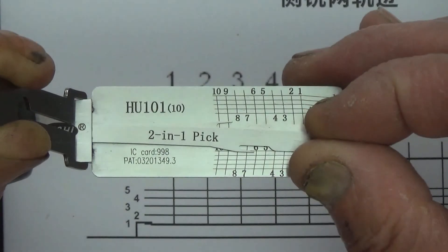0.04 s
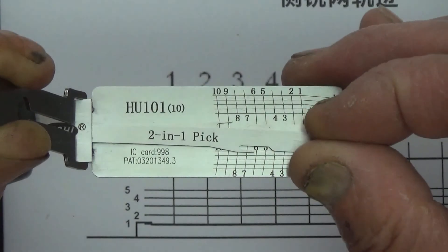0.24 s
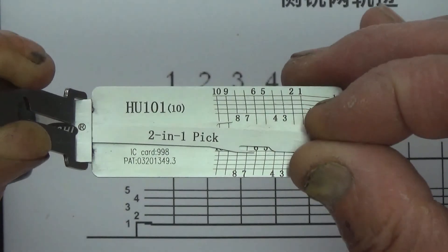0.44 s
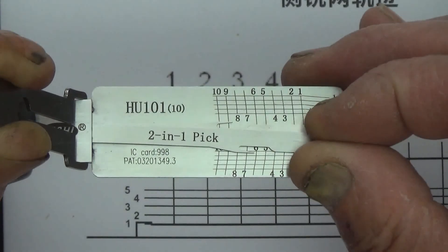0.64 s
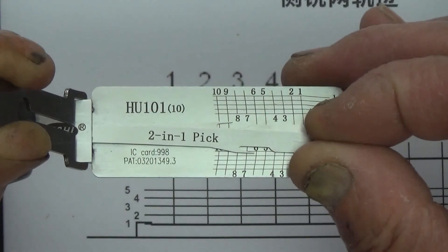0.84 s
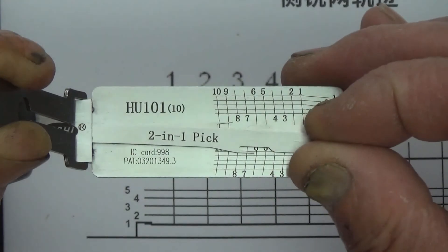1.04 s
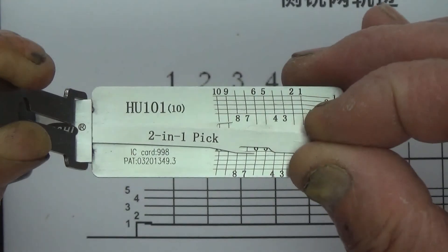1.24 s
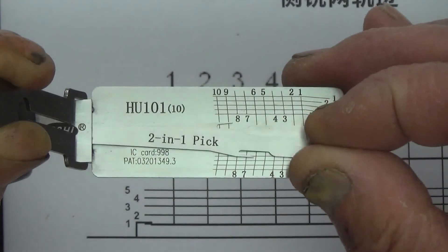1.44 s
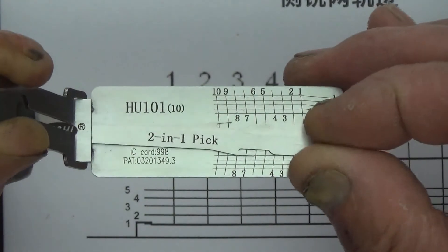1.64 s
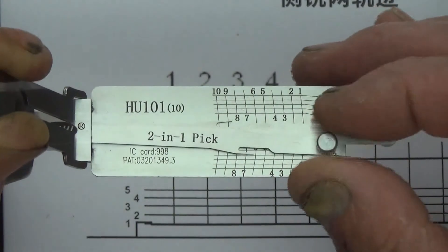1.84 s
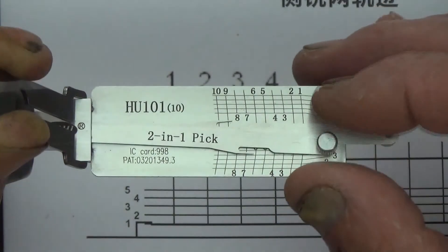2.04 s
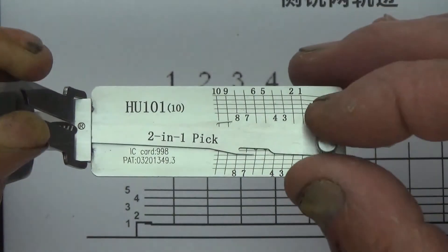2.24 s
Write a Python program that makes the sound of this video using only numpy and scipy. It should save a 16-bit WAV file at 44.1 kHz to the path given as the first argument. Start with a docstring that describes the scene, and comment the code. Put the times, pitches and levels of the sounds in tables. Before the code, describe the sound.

A steel lock pick snaps and clicks in a car lock over a faint fan hum.

```python
"""Picking a car lock

A steel pick works the wafers of a hand-held car lock, close up, over a desk in a small room.
A wafer snaps, ringing the steel and rattling loose parts; the lock knocks dully and the treble dips.
Later the grip shifts and the pick lever taps its stop: a tiny tick, then a light click.
Behind it a fan hums under a faint hiss."""
import sys
import numpy as np
from scipy import signal
from scipy.fft import rfft, irfft, next_fast_len
from scipy.io import wavfile
from scipy.ndimage import uniform_filter1d, map_coordinates

SR = 44100
rng = np.random.default_rng(int(sys.argv[2]) if len(sys.argv) > 2 else 0)


def file_out(sig):
    """Save sig as 16-bit WAV at sys.argv[1]."""
    # one column per channel
    cols = np.atleast_2d(sig).T
    # limit, then scale
    lim = np.clip(cols, -1, 1)
    pcm = np.round(lim * 32767).astype(np.int16)
    wavfile.write(sys.argv[1], SR, pcm)


N = 101871
T = np.arange(SR // 2) / SR  # time within one event, s

# Fan noise below, hiss above: f/Hz, relative level/dB
AIR_COLOUR = [(20, -25.5), (40, -5.5), (66, 1), (90, -4.5), (115, 3.5), (140, -5.5), (220, 1), (350, -4.5),
              (430, -4), (600, -9), (720, -10.5), (810, -4.5), (940, -10), (1010, -3.5), (1140, 0.5),
              (1210, -10.5), (1300, -7.5), (1450, -14.5), (2000, -17), (3000, -21.5), (4200, -24),
              (4500, -32.5), (4950, -69.5), (5300, -36), (5700, -22.5), (7000, -21), (8100, -21.5),
              (9000, -25), (9700, -32), (10400, -50.5), (11300, -59)]
# Left-right likeness of that noise: f/Hz, correlation
AIR_LIKENESS = [(60, -2.5), (140, 0.8), (340, 0.87), (810, 0.4), (1920, 0.97), (4560, 0.67), (10800, 0.16)]
# Its balance: f/Hz, left over right/dB
AIR_PAN = [(60, 6.5), (110, 2.5), (420, 3.5), (810, 7), (1200, 2.5), (3000, 2), (5700, 4.5), (10800, 5.5)]
# Fan tones: f/Hz, level/dB before BACKGROUND_GAIN
FAN_TONES = [(172, -76.5), (264, -78), (296, -84.5), (430, -80.5), (770, -80.5), (1028, -76), (1157, -73),
             (1287, -80.5)]
# Background drift: t/s, gain/dB
BACKGROUND_GAIN = [(1.45, 7.5), (1.6, 5.5), (1.8, 4.5), (2.0, 6)]
# Room decay: f/Hz, t60/s
ROOM_DECAY = [(150, .5), (600, .3), (2000, .26), (4200, .24), (7000, .15), (10000, .09), (13000, .026)]
# Treble dip after the snap: t/s, gain/dB
TREBLE_GAIN = [(1.488, 0), (1.501, -30), (1.56, -34), (1.615, -26), (1.64, -8), (1.72, 0)]

# Spectra of wafer crack, lever crack and loose parts: f/Hz, relative level/dB
WAFER_COLOUR = [(300, -28), (2000, -20), (3800, -13), (4700, -14), (5500, 0), (7200, -2), (8500, -7),
                (10300, -10), (11300, -20), (12000, -33), (13000, -32), (16000, -55)]
LEVER_COLOUR = [(300, -23), (2000, -30), (4000, -7.5), (5400, 3), (7200, -1.5), (8500, -24), (10300, -11),
                (11300, -20), (12500, -75)]
RATTLE_COLOUR = [(200, -14), (700, 4.5), (1000, 2.5), (1300, -17), (1600, -5), (1950, -18.5), (2300, -12),
                 (2800, 8), (3300, 3.5), (4200, -6), (4650, -14), (5400, -1), (7400, 6), (8600, 0.5),
                 (10200, 1), (12000, -34.5), (16000, -65)]
# Decay of the loose parts: f/Hz, t60/s
RATTLE_DECAY = [(300, .14), (1000, .11), (2000, .045), (4500, .04), (6000, .08), (8500, .07), (10500, .04),
                (13000, .02)]
# Modes: f/Hz, relative level/dB, t60/s
STEEL_MODES = [(2250, -5, .02), (2640, -10, .025), (2950, -8, .03), (3279, 3, .042), (3420, 0, .032),
               (4110, -1, .016), (5480, -9, .07), (5589, -7, .14), (5720, -12, .14), (5860, -11, .15),
               (6030, -4, .08), (6340, -3, .07), (7036, -7, .06), (7277, -4, .08), (7833, -2, .07),
               (8450, -5, .05), (8947, -4, .06), (9550, -2, .022)]  # pick and wafer
LEVER_MODES = [(2331, -11, .06), (3338, -12, .03), (4129, -4, .03), (4260, -8, .03), (5500, 3, .01),
               (5770, -12, .05), (6500, 3, .008), (7273, -1, .03), (7560, -4, .04), (7967, -6, .035)]  # pick lever
BODY_MODES = [(157, -7, .26), (366, -8, .12), (410, -5, .17), (474, -5, .16), (540, -8, .14),
              (657, -11, .13), (730, -1, .1), (790, -11, .08), (915, -9, .11), (950, -7, .11),
              (1006, -6, .11), (1085, -9, .07), (1480, -7, .04), (1660, -3, .035)]  # lock body and desk
THUMP_MODES = [(390, 0, .024)]  # lock against fingers

# Lever on its stop: t/s, gain/dB
LEVER_TAPS = [(1.827, -33), (2.1696, 0)]
# Blows of the lock body: t/s, knock/dB, centre f/Hz, thump/dB
LOCK_KNOCKS = [(1.457, -31.5, 1100, -54), (1.4718, -31.5, 600, -22.5), (1.4825, -35, 950, -60),
               (1.489, -40, 300, -60), (1.511, -36.5, 220, -60)]
# Steel contacts in the lock: t/s, crack/dB, ring/dB, rattle/dB
WAFER_CONTACTS = [(1.4552, -14.5, -42, -39), (1.457, -27, -43, -43), (1.4612, -31, -41, -45),
                  (1.4637, -42, -43, -51), (1.4688, -38, -41, -50), (1.4713, -40, -43, -56),
                  (1.487, -48, -53, -54)]


def amp(db):
    """Decibels to gain."""
    return 10 ** (np.asarray(db) / 20)


def unit(x):
    """Scale to rms 1."""
    return x / np.sqrt(np.mean(x ** 2) + 1e-20)


def along(points, hz):
    """Interpolate (f/Hz, value) on a log axis."""
    f, v = np.transpose(points)
    return np.interp(np.log(hz + 1), np.log(f + 1), v)


def curve(points):
    """Interpolate (t/s, value) per sample."""
    return np.interp(np.arange(N) / SR, *np.transpose(points))


def fade(t60_s, t=T):
    """Exponential decay."""
    return np.exp(-np.log(1000) * t / np.maximum(t60_s, 1e-4))


def pan(db):
    """Stereo gains, left over right."""
    return amp([[db / 2], [-db / 2]])


def filtered(x, response):
    """Zero-phase filter, gain response(hz)."""
    size = x.shape[-1]
    m = next_fast_len(size + SR // 4)
    return irfft(rfft(x, m) * response(np.fft.rfftfreq(m, 1 / SR)), m)[..., :size]


def band_decay(x, decay):
    """Fade each band at its own t60."""
    hz, t, bands = signal.stft(x, SR, nperseg=128)
    bands = bands * fade(along(decay, hz)[:, None], t)
    return signal.istft(bands, SR, nperseg=128)[1][..., :len(T)]


def add(track, start_s, sound):
    """Mix in one event."""
    part = track[:, round(start_s * SR):][:, :len(T)]
    part += sound[..., :part.shape[1]]


def air():
    """Steady fan noise and hiss, rms 1, leaning left."""
    def mid_side_gains(hz):
        angle = np.arccos(np.clip(along(AIR_LIKENESS, hz), 0, 1)) / 2
        return amp(along(AIR_COLOUR, hz)) * [np.cos(angle), np.sin(angle)]

    mid, side = filtered(rng.standard_normal((2, N)), mid_side_gains)
    stereo = np.array([mid + side, mid - side])
    return unit(filtered(stereo, lambda hz: amp(np.outer([.5, -.5], along(AIR_PAN, hz)))))


def patchy(x, depth_db=2, above_hz=2000):
    """The hiss swells and thins in small patches."""
    hz, _, bands = signal.stft(x, SR, nperseg=1024)
    patches = uniform_filter1d(rng.standard_normal(bands.shape[1:]), size=4, axis=0)
    patches = unit(uniform_filter1d(patches, size=8, axis=1))
    gain = amp(depth_db * patches * (hz > above_hz)[:, None])
    return signal.istft(bands * gain, SR, nperseg=1024)[1][:, :N]


def fan(wander_hz=2.5):
    """Wavering fan tones over noise and hiss."""
    out = amp(-63.5) * patchy(air())
    for hz, db in FAN_TONES:
        wander = unit(uniform_filter1d(rng.standard_normal(N), size=2000))
        phase = 2 * np.pi * np.cumsum(hz + wander_hz * wander) / SR
        out += pan(2.5) * amp(db) * unit(np.sin(phase))
    return amp(curve(BACKGROUND_GAIN)) * out


def in_room(x, tail_db):
    """Direct sound plus a short tail, unrelated in the two ears."""
    tail = band_decay(rng.standard_normal((2, len(T))), ROOM_DECAY)
    tail /= np.linalg.norm(tail[0])
    return x + amp(tail_db) * signal.fftconvolve(x, tail, axes=1)[:, :N]


def dense_modes(colour, side_db=-9):
    """Countless close modes as noise, mostly alike in both ears."""
    mid, side = unit(filtered(rng.standard_normal((2, len(T))), lambda hz: amp(along(colour, hz))))
    return mid + amp(side_db) * np.array([side, -side])


def ring(modes, attack_s=.0002, detune=.003):
    """Damped modes; each blow seats the parts a little differently."""
    hz, db, t60_s = np.transpose(modes)
    left_db, right_db, shift, phase = rng.standard_normal((4, len(hz)))
    hz = hz * (1 + detune * shift)
    waves = np.sin(2 * np.pi * (hz[:, None] * T + phase[:, None])) * fade(t60_s[:, None])
    onset = 1 - np.exp(-(T / attack_s) ** 2)
    return amp(db + np.array([left_db, right_db])) @ waves * onset


def body(centre_hz, half_width_oct=.8):
    """Struck lock body and desk: modes near centre_hz ring most."""
    hz, db, t60_s = np.transpose(BODY_MODES)
    loss_db = 10 * np.log10(1 + (np.log2(hz / centre_hz) / half_width_oct) ** 4)
    return ring(np.transpose([hz, db - loss_db, t60_s]), attack_s=.001)


def rattle(grains_per_s=600, grain_db=3.5):
    """Small loose parts ring briefly; tiny contacts make it uneven."""
    knots = rng.standard_normal(int(T[-1] * grains_per_s) + 4)
    grain = unit(amp(grain_db * map_coordinates(knots, [T * grains_per_s])))
    return band_decay(dense_modes(RATTLE_COLOUR) * grain, RATTLE_DECAY)


def crack(colour):
    """Instant of contact: one minimum-phase pulse, then brief chatter."""
    m = 2048
    cepstrum = irfft(np.log(amp(along(colour, np.fft.rfftfreq(m, 1 / SR)))))
    cepstrum[1:m // 2] *= 2
    cepstrum[m // 2 + 1:] = 0
    pulse = irfft(np.exp(rfft(cepstrum)))
    pulse /= np.abs(pulse).max()
    chatter = amp(-9) * dense_modes(colour) * fade(t60_s=.007)
    return np.pad(pulse, (0, len(T) - m)) + chatter


def lever_taps(body_lag_s=.0005, top_hz=10300):
    """The lever clicks on its stop; a narrow band of the body answers."""
    out = np.zeros((2, N))
    for t, db in LEVER_TAPS:
        contact = amp(-21.5) * crack(LEVER_COLOUR) + amp(-38.5) * ring(LEVER_MODES)
        contact += amp(-43.5) * rattle()
        add(out, t, amp(db) * contact)
        add(out, t + body_lag_s, amp(db - 37.5) * body(centre_hz=740, half_width_oct=.36))
    return filtered(out, lambda hz: 1 / (1 + (hz / top_hz) ** 20))


def lock_knocks():
    """The freed lock jolts, bumps the fingers and settles."""
    out = np.zeros((2, N))
    for t, knock_db, centre_hz, thump_db in LOCK_KNOCKS:
        add(out, t, amp(knock_db) * body(centre_hz))
        add(out, t, amp(thump_db) * ring(THUMP_MODES, attack_s=.001))
    return out


def wafer_snap(full_scale_top_hz=15000, hz_per_db=130):
    """The wafer snaps and clatters to rest; weaker contacts are duller."""
    out = np.zeros((2, N))
    for t, crack_db, ring_db, rattle_db in WAFER_CONTACTS:
        contact = amp(crack_db) * crack(WAFER_COLOUR) + amp(ring_db) * ring(STEEL_MODES)
        contact += amp(rattle_db) * rattle()
        lowpass = signal.butter(6, full_scale_top_hz + hz_per_db * crack_db, fs=SR, output="sos")
        add(out, t, signal.sosfilt(lowpass, contact))
    return out


def treble_dip(x, edge_hz=1300, ring_hz=5780, half_width_hz=220):
    """The treble dips after the snap; the bass and one band of steel ring stay."""
    def spared(hz):
        return 1 / (1 + (hz / edge_hz) ** 20) + 1 / (1 + ((hz - ring_hz) / half_width_hz) ** 4)

    kept = filtered(x, spared)
    return kept + amp(curve(TREBLE_GAIN)) * (x - kept)


def scene():
    """Lock, lever and fan, all left of centre."""
    lock = wafer_snap() + lock_knocks()
    lever = lever_taps()
    mix = pan(7) * in_room(lock, tail_db=-16) + pan(8) * in_room(lever, tail_db=-10.5) + fan()
    return treble_dip(mix)


def record(dry):
    """Steep low-pass at 14.5 kHz."""
    return filtered(dry, lambda hz: 1 / (1 + (hz / 14500) ** 60))


dry = scene()
out = record(dry)
file_out(out)
```